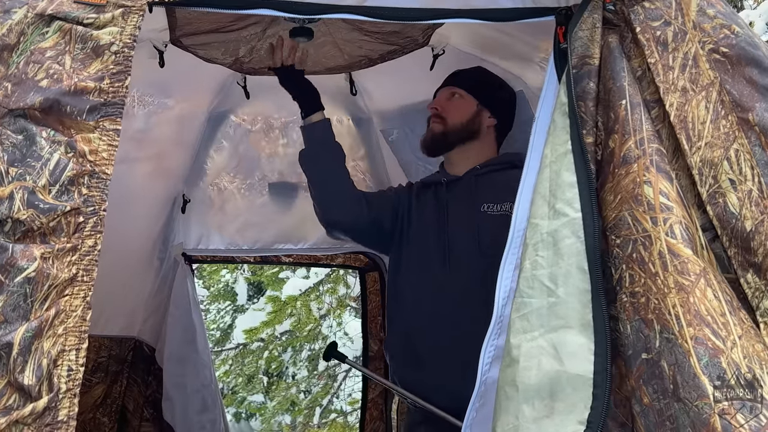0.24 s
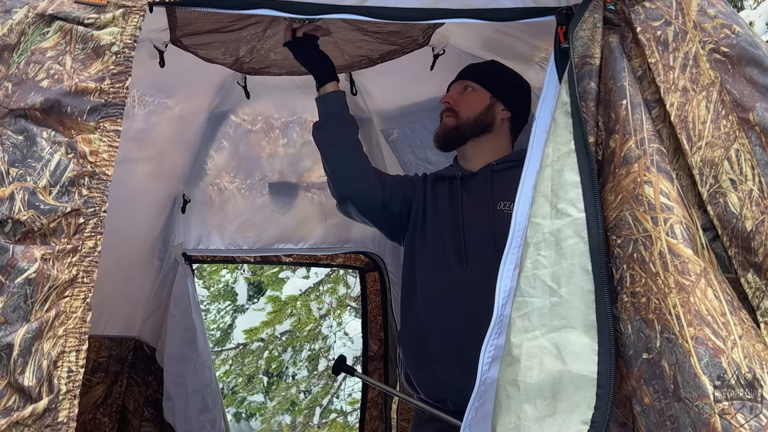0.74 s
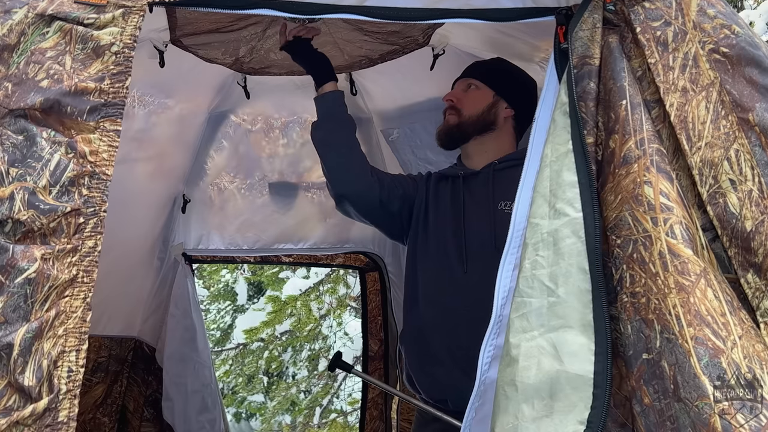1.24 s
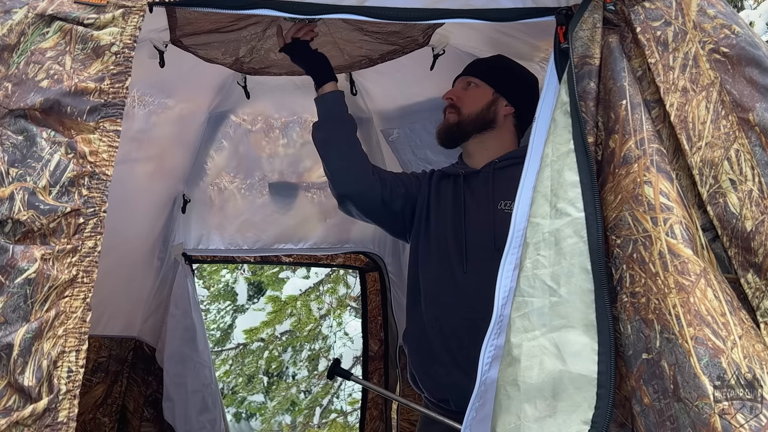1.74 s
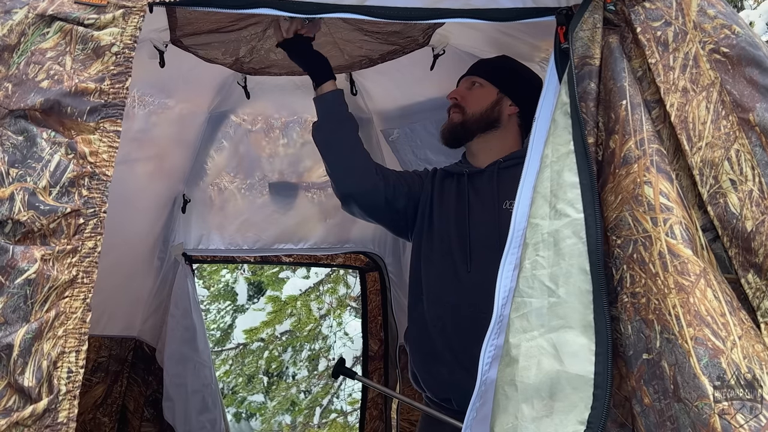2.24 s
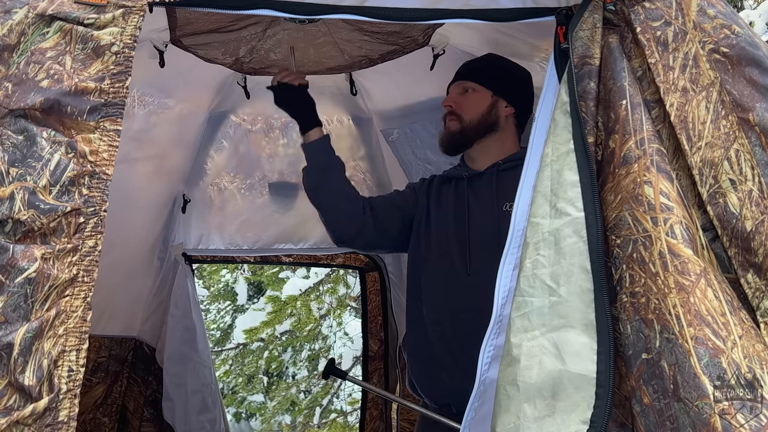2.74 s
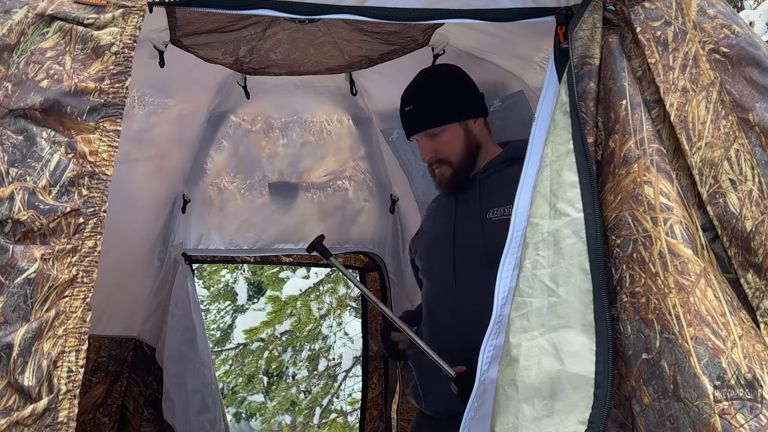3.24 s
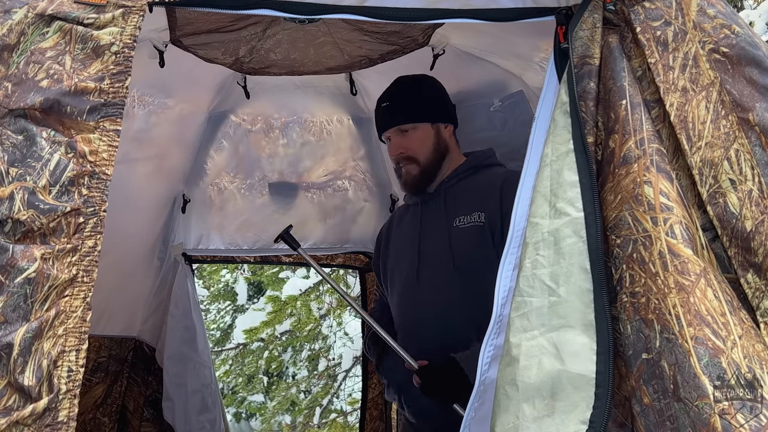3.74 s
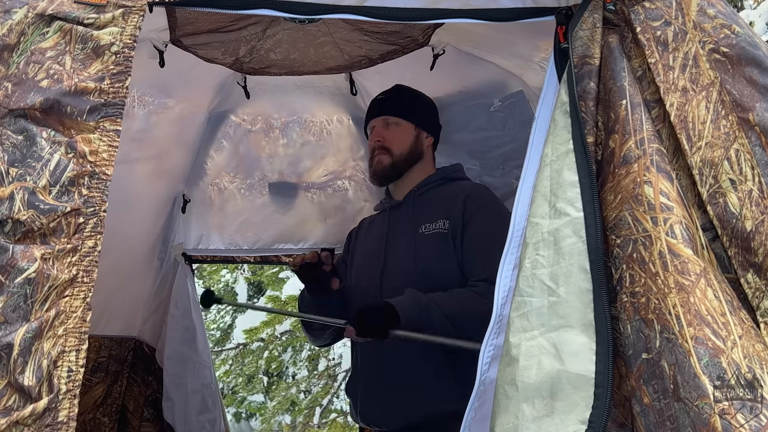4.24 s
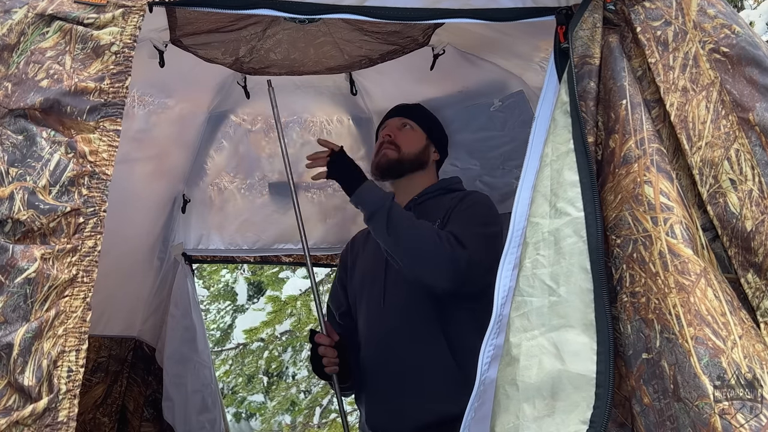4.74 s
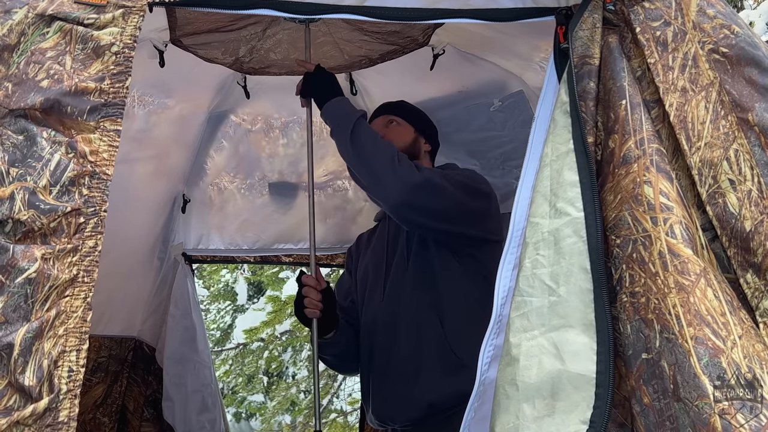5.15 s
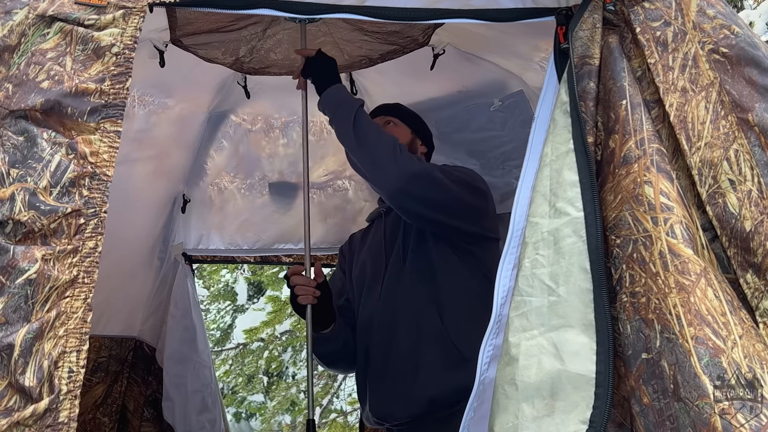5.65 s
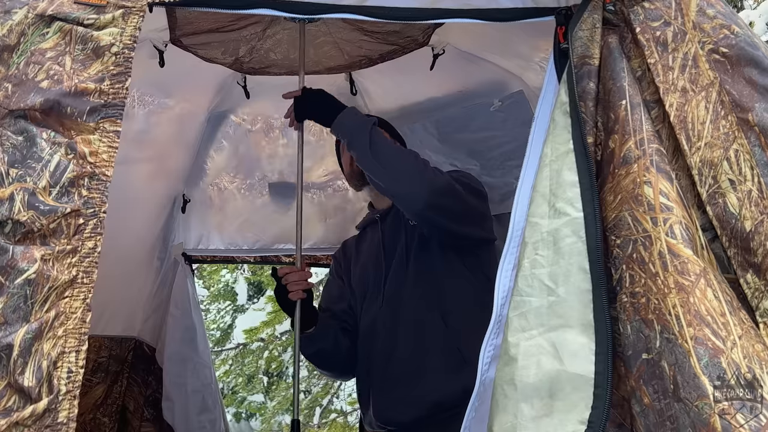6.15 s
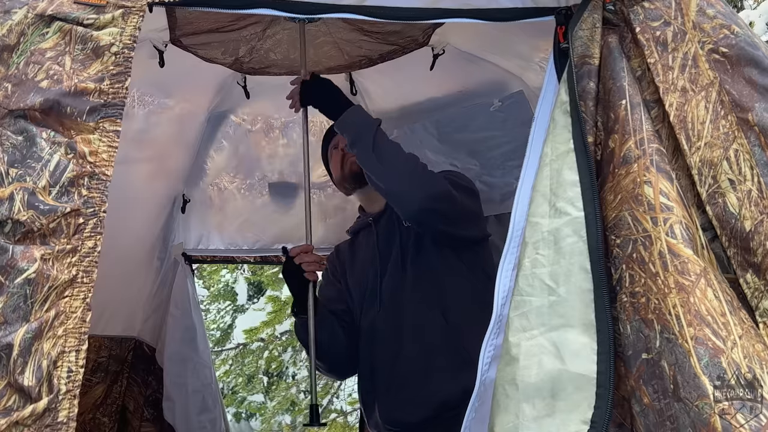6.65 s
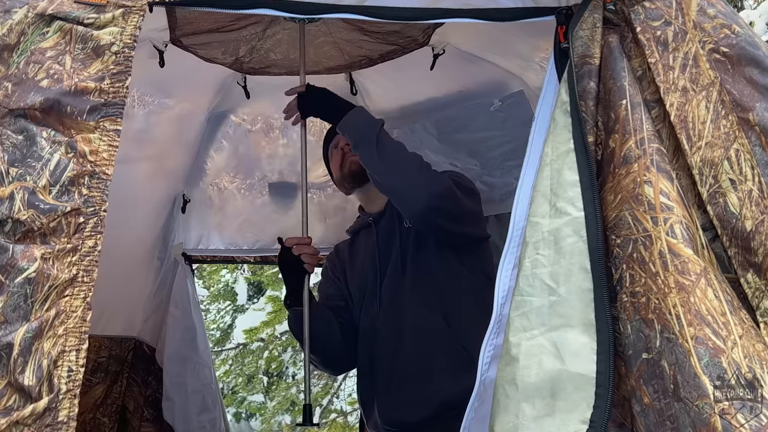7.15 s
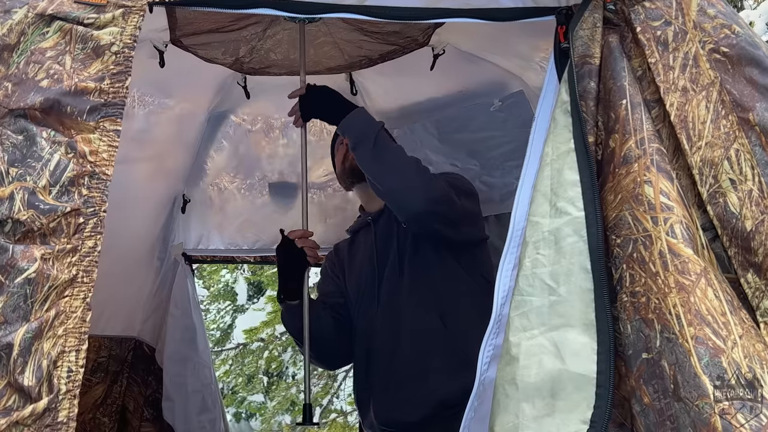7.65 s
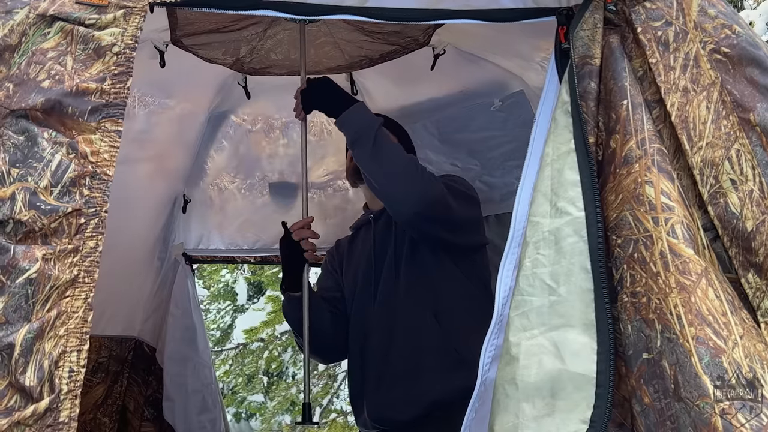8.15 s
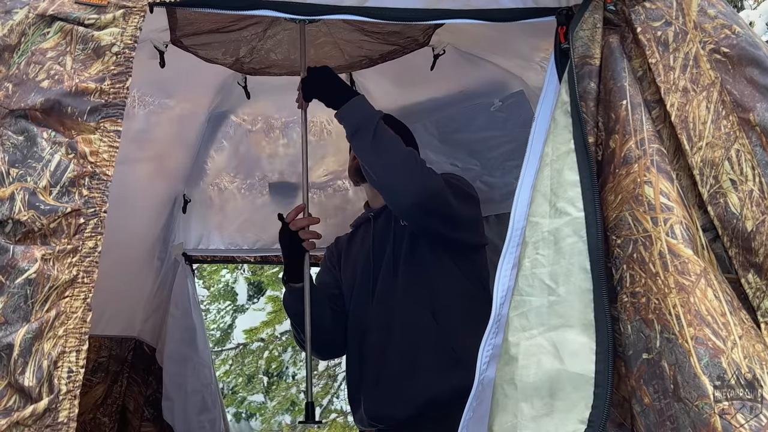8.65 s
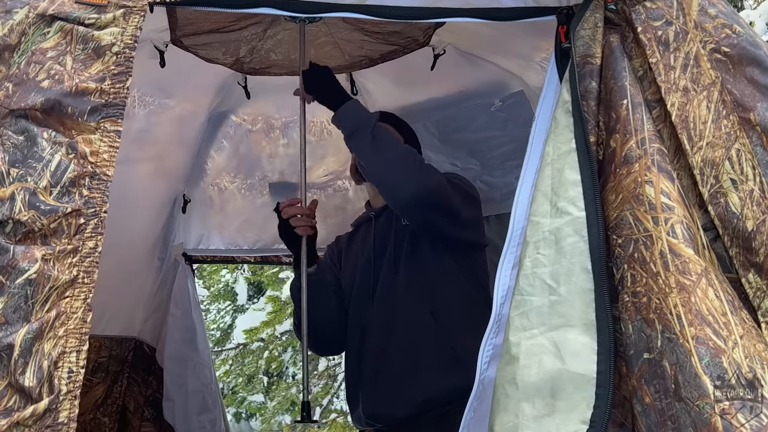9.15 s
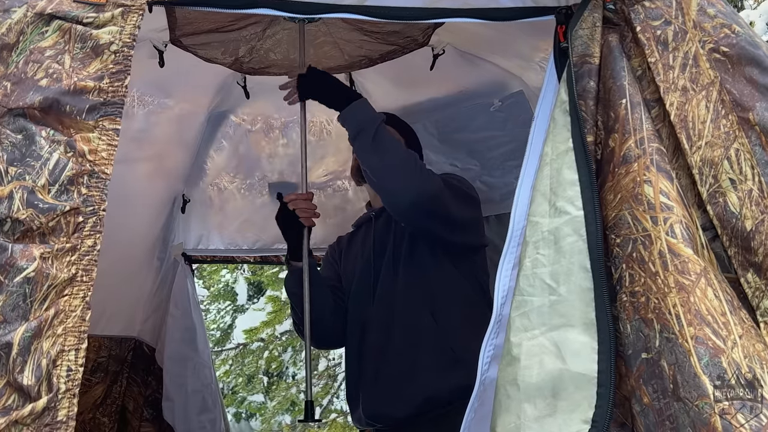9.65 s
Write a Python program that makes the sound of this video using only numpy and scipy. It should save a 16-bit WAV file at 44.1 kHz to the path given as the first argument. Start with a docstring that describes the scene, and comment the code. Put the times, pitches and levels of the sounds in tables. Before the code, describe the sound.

Within a small fabric tent, over a very quiet, steady outdoor hush, a hand fiddles with a metal roof fitting. From 0 to 2.2 s there are sparse, faint, damped clinks with soft cloth tugs and grinding, slightly stronger after 1.2 s. At about 2.3-2.4 s two bright, sharp clinks stand out, followed at 2.55-2.65 s by a quick loose rattle, sagging in pitch. A clack at 3.1 s starts light metallic scraping; another clack comes at 3.8 s, and a cluster of scrape, clacks and low jolts at 4.5-4.7 s. From 5.1 to 5.55 s the pole bumps the roof: short ringing knocks with dull cloth thumps. Light contacts follow near 6.1 s, then a hard clack and knock at 6.4 s. The rest is subdued: soft hand rubs, dull finger taps and small clicks until nearly 10 s. Echoes are short and dry.

```python
"""A telescoping metal pole is slid out and pushed against the roof inside a fabric tent: struck modes
ring the tube and drum the taut cloth, while tiny random friction slips make its scrapes and rubs.
First a hand fiddles with a small metal roof fitting, damped modes that clink and then rattle loose.
Noise bursts give the cracks, ticks and taps; short echoes place contacts in the tent.
Hands finally rub and adjust the pole; a quiet outdoor hush of coloured noise lies under it all."""
import sys
import numpy as np
from scipy import signal
from scipy.fft import rfft, irfft, next_fast_len
from scipy.io import wavfile
from scipy.ndimage import map_coordinates

SR = 44100
rng = np.random.default_rng(int(sys.argv[2]) if len(sys.argv) > 2 else 0)


def transcribe(u):
    """Save the signal u as a 16-bit wav file named by the first command-line argument.

    u: samples, shape (n,) or (channels, n), limited to [-1, 1]; the rate is SR.
    q: integer samples, one column per channel.
    """
    v = np.clip(np.atleast_2d(u).T, -1, 1)
    q = np.round(v * 32767).astype(np.int16)
    wavfile.write(sys.argv[1], SR, q)


N = 436590
AGE = np.arange(SR // 3) / SR  # time since a contact (s)

# Event, mode and spectrum levels are relative: each source trims them in its mix.
# modes of the pole's tube: f/Hz, level/dB, t60/s
TUBE_MODES = [(1994, 1.5, 0.035), (2505, -5.5, 0.09), (2933, -1.5, 0.05), (3050, -13, 0.13),
              (3420, 0, 0.055), (3630, -20, 0.072), (3860, 0, 0.022), (4397, -6, 0.062)]
# modes of the taut roof cloth: f/Hz, level/dB, t60/s
ROOF_MODES = [(82.4, -8, 0.079), (116.5, 3, 0.061), (192.5, -0.5, 0.063), (332, 0.5, 0.052)]
# modes of the stiff roof centre: f/Hz, level/dB, t60/s
HUB_MODES = [(443, 4, 0.028), (647, 8, 0.079), (948, -0.5, 0.044), (1105, 11, 0.019), (1235, 10.5, 0.025)]
# low-cut colour of the thumps and sways as the microphone hears them, little below 60 Hz: f/Hz, level/dB
THUMP_COLOUR = [(30, -44), (55, -18), (72, 2.5), (400, 3.5), (2000, -30)]
# dull thud of a blow: f/Hz, level/dB per Hz
THUD_SPECTRUM = [(40, -63.5), (90, 6.5), (400, 6.5), (800, 0.5), (1400, 2.5), (2200, -7.5), (6000, -30.5)]
# dead clack of tube sections and dry tick of the grip: f/Hz, level/dB per Hz
CLACK_SPECTRUM = [(300, -7.5), (900, -3), (1500, -8.5), (3400, 7), (4500, -0.5), (8000, -10.5),
                  (13000, -14.5), (16000, -22.5)]
# scrape of metal sliding: f/Hz, level/dB per Hz
SCRAPE_SPECTRUM = [(250, -4), (800, -5.5), (1250, 1), (2200, -2), (3500, 3.5), (4500, -6.5), (8000, -11),
                   (13000, -18.5), (16000, -21.5)]
# low rub of the pole: f/Hz, level/dB per Hz
LOW_SPECTRUM = [(25, -1), (55, -14), (80, -13), (130, -7.5), (180, -6.5), (260, 0.5), (450, -3.5),
                (800, -4), (2000, -50)]


def amp(db):
    """Decibels to gain."""
    return 10 ** (np.asarray(db) / 20)


def unit(x):
    """Scale to rms 1."""
    return x / np.sqrt(np.mean(x ** 2) + 1e-20)


def fade(t60):
    """Exponential decay of a contact, 60 dB down after t60 seconds."""
    return 1000 ** (-AGE / t60)


def colour(x, spectrum):
    """Causal minimum-phase filter through (Hz, dB) points, by folding the cepstrum."""
    m = 2 * next_fast_len(len(x))
    hz, db = np.transpose(spectrum)
    log_hz = np.log(np.fft.rfftfreq(m, 1 / SR) + 1)
    gain = amp(np.interp(log_hz, np.log(hz), db))
    cepstrum = irfft(np.log(gain))
    cepstrum[1:m // 2] *= 2
    cepstrum[m // 2 + 1:] = 0
    return irfft(rfft(x, m) * np.exp(rfft(cepstrum)))[:len(x)]


def noise(spectrum):
    """Steady coloured noise of rms 1, as long as the scene."""
    return unit(colour(rng.standard_normal(N), spectrum))


def wobble(rate):
    """A smooth random curve, rate knots a second."""
    knots = rng.standard_normal(int(N * rate / SR) + 4)
    return map_coordinates(knots, [np.arange(N) * rate / SR])


def swell(start, hold, rise, release):
    """Gain of one hand movement: exponential rise, hold and release (all in s)."""
    t = np.arange(N) / SR - start
    before = np.minimum(t, 0) / rise
    after = np.maximum(t - hold, 0) / release
    return np.exp(np.maximum(before - after, -20))


def burst(spectrum, t60, rise=0.00062):
    """The short noisy crack of two surfaces meeting."""
    envelope = fade(t60) * (1 - np.exp(-AGE / rise)) ** 2
    return colour(rng.standard_normal(len(AGE)) * envelope, spectrum)


def ring(modes, attack):
    """Damped modes, struck at slightly new strengths each time."""
    tones = sum(amp(db + 2 * rng.normal()) * fade(t60) * np.sin(2 * np.pi * hz * AGE)
                for hz, db, t60 in modes)
    return tones * (1 - np.exp(-AGE / attack))


def slips(rate):
    """Friction: a stream of tiny random slips, rate a second, each with a short diffuse tail."""
    clicks = rng.standard_normal(N) * (rng.random(N) < rate / SR)
    decay = fade(0.12) ** 2  # of power
    tail_power = abs(signal.fftconvolve(clicks ** 2, decay / decay.sum())[:N])
    tail = np.sqrt(tail_power) * rng.standard_normal(N)
    return unit(clicks + amp(2) * tail)


def through(x, modes):
    """A lasting excitation rings a body; rms 1."""
    return unit(signal.fftconvolve(x, ring(modes, attack=.0003))[:N])


def tent(x, wet_db, t60):
    """A contact with its wall echoes and short diffuse tail, at rms 1 over its first 20 ms."""
    # early wall echoes: delay/s (varied 8 % either way), gain
    walls = [(.0042, 0.37), (.0075, 0.25), (0.0139, .35)]
    tail = rng.standard_normal(len(AGE)) * fade(t60) * (1 - np.exp(-AGE / 0.0037))
    response = amp(wet_db) * tail / np.linalg.norm(tail)
    response[0] = 1
    for delay, gain in walls:
        response[int(delay * rng.uniform(.92, 1.08) * SR)] += gain
    heard = signal.fftconvolve(x, response)[:len(AGE)]
    return heard / np.std(heard[:SR // 50])


def add(track, s, sound):
    """Mix a sound into the track at time s."""
    part = track[max(round(s * SR), 0):][:len(sound)]
    part += sound[:len(part)]


def hush():
    """Still outdoor air, barely moving: coloured noise whose level wanders slowly."""
    # the air outside: f/Hz, level/dB per Hz
    air = [(15, -48), (25, -3), (43, -5.5), (116, -3.5), (178, -5.5), (240, -4), (274, -3.5), (495, -4.5),
           (631, -4.5), (1240, -12.5), (1340, -11.5), (1450, -15), (2490, -16.5), (15500, -23.5)]
    return noise(air) * amp(-54 + 0.74 * wobble(1.9))


def clinks():
    """The hand damps the fitting, so each clink is a brief ping that the tent draws out."""
    # the roof fitting clinks: t/s, ring level/dB, edge level/dB re ring
    contacts = [(0.0179, -43, -23), (0.3924, -42, -23.5), (0.4406, -47, -18), (0.7337, -50, -24),
                (0.7655, -33, -29), (0.995, -32.5, -40), (1.0523, -56, -23), (1.1868, -24, -41),
                (1.2548, -29, -36), (1.4677, -28, -20), (1.482, -23.5, -30), (1.729, -27.5, -21),
                (1.9907, -48, -28), (2.0662, -44.5, -21), (2.2514, -28, -27), (2.297, -31.5, -17),
                (2.3218, -16.5, -14.5), (2.3244, -4.5, -13.5), (2.372, -18, -20), (2.395, -4, -27.5),
                (2.4339, -12, -38), (2.497, -26, -10.5), (2.5296, -31.5, -15.5)]
    # modes of the fitting: f/Hz, level/dB, t60/s
    fitting_modes = [(1865, -16.5, 0.017), (3315, -10, 0.018), (3379, -0.5, 0.018), (3532, -3, .016),
                     (5270, -34.5, .015), (6500, -35.5, .025), (9000, -36.5, 0.015), (10300, -40.5, .02),
                     (14900, -46, 0.017)]
    # dull knock under each clink: f/Hz, level/dB per Hz
    knock_spectrum = [(30, -13), (80, 3.5), (150, -3.5), (700, 1), (1250, -0.5), (2500, -5.5), (5000, -17),
                      (16000, -49.5)]
    # bright edge of each clink: f/Hz, level/dB per Hz
    edge_spectrum = [(1500, -35), (4200, -1.5), (5200, -4.5), (5800, -5), (6500, -2), (9000, -10),
                     (12000, -15.5), (15500, -17.5)]
    grind_max_db, grind_under_db = -48.5, -6.5  # loudest grinding; its level re a faint clink
    grind_rise_s, grind_release_s = 0.018, 0.043  # finger pressure builds and eases
    out, pressure = np.zeros(N), np.zeros(N)
    for s, db, edge_db in contacts:
        ping = tent(ring(fitting_modes, attack=0.0013), wet_db=-4, t60=0.195)
        knock = tent(burst(knock_spectrum, t60=0.015, rise=0.00052), wet_db=3, t60=0.081)
        edge = tent(burst(edge_spectrum, t60=.018, rise=0.0025), wet_db=0, t60=0.18)
        # a louder or sharper contact also knocks harder
        knock_db = -39.5 + 0.54 * (db + 31) + .25 * (edge_db + 27)
        add(out, s, amp(db - 10.5) * ping)
        add(out, s - .001, amp(knock_db - 10) * knock + amp(db + edge_db - 14) * edge)
        grind = amp(min(grind_max_db, db + grind_under_db))
        press = swell(s, 0, grind_rise_s, grind_release_s)
        pressure = np.maximum(pressure, grind * press)
    # metal grinds on metal as the pressure builds and eases around each clink
    return out + pressure * through(slips(260), fitting_modes)


def grip_ticks():
    """Small dry ticks of the grip: very short noise bursts."""
    # t/s, level/dB
    ticks = [(0.189, -39.5), (3.0211, -35), (3.6755, -37), (3.764, -36), (5.1763, -32), (6.8828, -31.5),
             (9.6478, -45)]
    out = np.zeros(N)
    for s, db in ticks:
        tick = tent(burst(CLACK_SPECTRUM, t60=0.0062), wet_db=-9.0, t60=0.097)
        add(out, s, amp(db - 14.5) * tick)
    return out


def cloth_tugs():
    """Soft tugs set the roof cloth swaying in two low modes."""
    # t/s, level/dB
    pulls = [(0.37, -38), (0.395, -35), (0.686, -37.5), (0.971, -39.5), (1.47, -39), (2.322, -35.5),
             (2.575, -32.5), (4.533, -18), (4.669, -31), (5.257, -23.5), (5.404, -22), (6.28, -33.5),
             (6.401, -17)]
    out = np.zeros(N)
    for s, db in pulls:
        sway = ring([(82.7, -10, 0.1), (125, -5, 0.051)], attack=0.00573)
        tug = tent(colour(sway, THUMP_COLOUR), wet_db=-15.5, t60=0.47)
        add(out, s, amp(db - 13.5) * tug)
    return out


def finger_taps():
    """Dull finger taps: short noise bursts with little treble."""
    # t/s, level/dB
    taps = [(0.3902, -37), (7.3716, -43.5), (7.707, -42.5), (7.7969, -42.5), (8.107, -41), (9.0538, -41.5),
            (9.4778, -39), (9.5837, -45)]
    # colour of a fingertip: f/Hz, level/dB per Hz
    finger = [(250, -5), (800, -4), (1300, 6.5), (2000, 6.5), (2600, 0), (3400, -0.5), (4400, -19),
              (6000, -25), (16000, -37.5)]
    out = np.zeros(N)
    for s, db in taps:
        tap = tent(burst(finger, t60=0.016, rise=0.00086), wet_db=8.0, t60=0.053)
        add(out, s, amp(db - 10) * tap)
    return out


def rattle():
    """Let go, the fitting chatters at a pitch that sags and shifts a little with each contact."""
    # the loose fitting rattles: t/s, ring level/dB
    contacts = [(2.5556, -22), (2.5609, -14.5), (2.5725, -16), (2.5854, -12.5), (2.5948, -14.5),
                (2.6107, -16.5), (2.6244, -16.5)]
    # its modes, before the pitch factor: f/Hz, level/dB, t60/s
    loose_modes = [(2016, 5.5, 0.017), (2940, -0.5, 0.06), (3352, 1.5, 0.05), (3620, -4, 0.022),
                   (6500, -30, 0.038)]
    # crack of each contact: f/Hz, level/dB per Hz
    chatter = [(250, -9), (1000, -7), (2000, 2), (2500, 2), (3200, 0.5), (4200, -21), (5200, -12),
               (6000, -19.5), (6550, -11), (7400, -30.5), (16000, -39)]
    first_pitch, sag_oct_per_s = 1.025, 0.72  # mean pitch factor of the first contact; its fall
    out = np.zeros(N)
    for s, db in contacts:
        sag_oct = sag_oct_per_s * (s - contacts[0][0])
        pitch = first_pitch * 2 ** (-sag_oct + 0.023 * rng.normal())
        ping = tent(ring(np.array(loose_modes) * [pitch, 1, 1], attack=.0003), wet_db=3, t60=0.13)
        crack = tent(burst(chatter, t60=0.044), wet_db=-7.5, t60=.15)
        add(out, s, amp(db - 12) * ping + amp(db - 15.5) * crack)
    return out


def sliding():
    """The sections scrape out push by push; harder pushes send more low rub down the pole."""
    # pushes on the pole: start t/s, hold/s, scrape level/dB, rise/s
    strokes = [(3.107, 0.015, -39, 0.013), (3.426, 0.054, -33.5, 0.042), (3.62, 0.068, -43.5, 0.041),
               (3.73, 0.19, -50, 0.02), (4.163, 0.046, -42, 0.043), (4.27, 0.1, -42, 0.038),
               (4.453, 0.055, -41, 0.034), (4.539, 0.12, -28.5, 0.0043), (4.715, 0.11, -45.5, 0.02),
               (4.849, 0.006, -38, 0.013), (4.896, 0.086, -52.5, 0.02)]
    release_s = 0.026  # a push dies away
    pushes = [amp(db) * swell(s, hold, rise, release_s) for s, hold, db, rise in strokes]
    push = np.max(pushes, axis=0)
    # low rub of -34.5 dB under a push of -29 dB, growing 1.58 dB per dB
    rub = amp(-34.5) * (push / amp(-29)) ** 1.58
    friction = slips(1100) + 0.32 * rng.standard_normal(N)
    grit = unit(colour(friction, SCRAPE_SPECTRUM))
    flicker = amp(1.1 * wobble(90) - 1.5)
    return push * grit * flicker + rub * noise(LOW_SPECTRUM)


def catches():
    """Sections catch with a dead clack, muffled by the hands, and jolt the pole."""
    # t/s, clack level/dB, low level/dB re clack
    jolts = [(3.111, -19, -48), (3.8304, -17, -2), (3.8824, -30, -17), (4.178, -33, -29), (4.5374, -19, 3),
             (4.594, -21, -3), (4.6756, -22, 2), (6.405, -11, -8.5), (8.314, -34, -17.5),
             (9.0834, -34.5, -3.5), (9.203, -31, -3)]
    # low sway of the held pole: f/Hz, level/dB, t60/s
    body_modes = [(81.5, -1, 0.024), (126, -7, 0.04), (247, -3.5, 0.025), (336, -28.5, 0.051)]
    out = np.zeros(N)
    for s, db, low_db in jolts:
        clack = tent(burst(CLACK_SPECTRUM, t60=0.0205, rise=0.00053), wet_db=1.0, t60=0.16)
        jolt = tent(burst(THUD_SPECTRUM, t60=0.048, rise=0.0031), wet_db=-17.0, t60=0.11)
        body = colour(ring(body_modes, attack=0.00023), THUMP_COLOUR)
        sway = tent(body, wet_db=-21, t60=0.19)
        add(out, s, amp(db - 12.5) * clack)
        add(out, s - .0015, amp(db + low_db - 11) * jolt + amp(db + low_db - 12.5) * sway)
    return out


def knocks():
    """Each bump rings the tube, knocks the hub and sets the roof cloth drumming."""
    # the pole bumps the roof: t/s, tube level/dB, roof level/dB, centre of the tube's ring f/Hz
    bumps = [(5.0972, -11.5, -28.5, 2520), (5.209, -35.5, -47.5, 2900), (5.3137, -16, -42, 2980),
             (5.33, -14, -46, 3500), (5.354, -10, -48.5, 3120), (5.408, -36, -40.5, 2300),
             (5.419, -28.5, -49, 2450), (5.5388, -17.5, -29.5, 2600), (6.0668, -50, -52.5, 3000),
             (6.097, -39.5, -47.5, 3200), (6.2056, -56, -51.5, 2800), (6.2209, -42, -48, 2800),
             (6.302, -20, -67, 3650), (6.4026, -12, -30.5, 4100)]
    # overtones of the tube: f/Hz, level/dB, t60/s
    top_modes = [(4260, -2, 0.047), (5470, 9.5, 0.034), (6400, 0, 0.065), (7140, -4, 0.075),
                 (7720, -2, 0.074), (8450, -12, 0.086), (11000, -14, 0.1), (11600, -11, 0.059),
                 (12400, -15, .07)]
    # crack of the pole's tip: f/Hz, level/dB per Hz
    edge_spectrum = [(200, -39), (1100, 7.5), (1700, 7.5), (3400, 9.5), (5000, 3), (8000, -8.5),
                     (12000, -11.5), (16000, -20.5)]
    focus_db_per_oct = 19.5  # modes away from the centre of a blow are struck less
    treble_grows = 0.13  # tilt of the crack above 5 kHz (dB per octave) per dB of blow
    out = np.zeros(N)
    for s, db, roof_db, centre_hz in bumps:
        # harder blows reach further into the treble
        tilt = treble_grows * (db + 13)
        bright = [(hz, level + tilt * max(np.log2(hz / 5000), 0)) for hz, level in edge_spectrum]
        # the grip shifts the modes a little and favours those near the centre
        gripped = [(hz * (1 + 0.0089 * rng.normal()),
                    level - focus_db_per_oct * abs(np.log2(hz / centre_hz)), t60)
                   for hz, level, t60 in TUBE_MODES]
        tube = tent(ring(gripped, attack=0.0012), wet_db=-0.5, t60=0.11)
        top = tent(ring(top_modes, attack=0.0014), wet_db=8, t60=0.17)
        edge = tent(burst(bright, t60=0.016, rise=0.0029), wet_db=-2.5, t60=0.19)
        drumming = colour(ring(ROOF_MODES, attack=0.0015), THUMP_COLOUR)
        thump = tent(drumming, wet_db=-13, t60=0.15)
        hub = tent(ring(HUB_MODES, attack=0.0012), wet_db=-5.5, t60=0.016)
        thud = tent(burst(THUD_SPECTRUM, t60=0.031, rise=0.0028), wet_db=-4.5, t60=0.087)
        graze = tent(burst(edge_spectrum, t60=0.02, rise=0.0012), wet_db=-12, t60=.1)
        edge_db = db - 17.5
        thump_db = -41 + 0.74 * (roof_db + 42)  # the cloth grows less than the knock
        add(out, s - .007, amp(roof_db - 15) * graze)  # the tip brushes just before it lands
        add(out, s, amp(db - 16.5) * tube + amp(edge_db - 17.5) * top)
        add(out, s - .002, amp(edge_db - 4.5) * edge + amp(thump_db + 3) * thump)
        add(out, s - .002, amp(roof_db + 2.0) * hub + amp(roof_db - 1.5) * thud)
    return out


def rubbing():
    """The hands rub the upright tube, half damping it, and its tip stirs the roof."""
    # hands shift along the pole: start t/s, hold/s, tube level/dB, roof level/dB
    rubs = [(6.07, 0.19, -76, -53.5), (6.352, 0.053, -43, -55), (6.816, 0.018, -57.5, -50),
            (7.337, 0.044, -51.5, -52), (7.704, 0.11, -53.5, -59), (8.174, 0.17, -50.5, -51),
            (8.47, 0.015, -69.5, -54.5), (8.576, 0.12, -59.5, -67.5), (8.751, 0.029, -59.5, -48.5),
            (9.045, 0.055, -53, -56), (9.211, 0.056, -76, -49.5), (9.462, 0.024, -50.5, -52.5),
            (9.58, 0.082, -67, -58)]
    rise_s, release_s = 0.052, 0.024  # a hand eases into and out of each shift
    tube_level, roof_level = np.zeros(N), np.zeros(N)
    for s, hold, tube_db, roof_db in rubs:
        shift = swell(s, hold, rise_s, release_s)
        tube_level += amp(tube_db) * shift
        roof_level += amp(roof_db) * shift
    friction = slips(220)
    held = np.array(TUBE_MODES) * [1, 1, .5]  # the hands halve the ring times
    scrape = unit(colour(friction, SCRAPE_SPECTRUM))
    tube = amp(-8) * through(friction, held) + amp(-4.5) * scrape
    drumming = unit(colour(through(slips(800), ROOF_MODES), THUMP_COLOUR))
    cloth = amp(-3.5) * drumming + amp(-9.5) * noise(LOW_SPECTRUM)
    thud = unit(colour(friction, THUD_SPECTRUM))
    roof = cloth + amp(-10.5) * thud + amp(-7) * through(friction, HUB_MODES)
    return tube_level * tube + roof_level * roof


def scene():
    """Everything in the tent, on one channel."""
    fitting = clinks() + rattle()
    hands = grip_ticks() + cloth_tugs() + finger_taps()
    pole = sliding() + catches() + knocks() + rubbing()
    return (hush() + fitting + hands + pole)[None]


def record(dry):
    """The microphone passes nothing above its band limit."""
    top_hz = 15950
    m = next_fast_len(N + SR // 2)
    passed = np.fft.rfftfreq(m, 1 / SR) < top_hz
    return irfft(rfft(dry, m) * passed, m)[..., :N]


dry = scene()
out = record(dry)
transcribe(out)
```